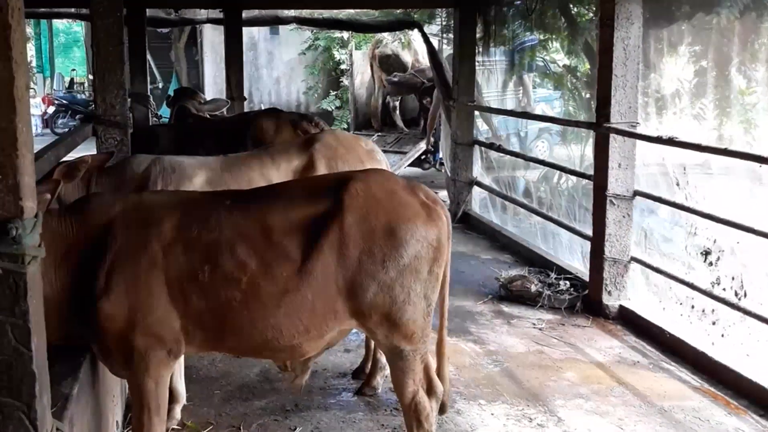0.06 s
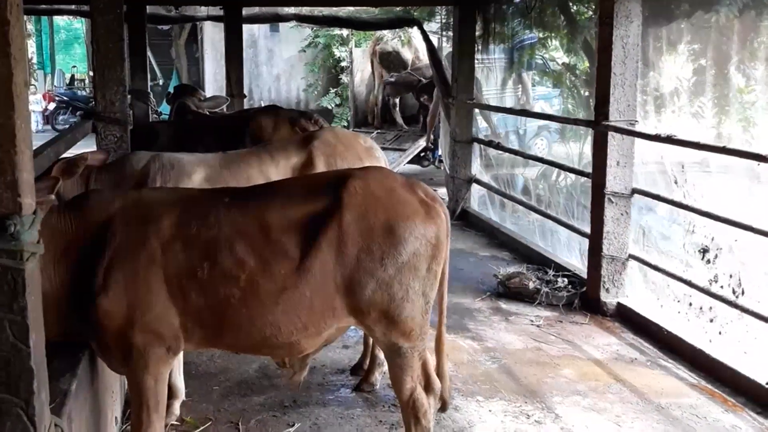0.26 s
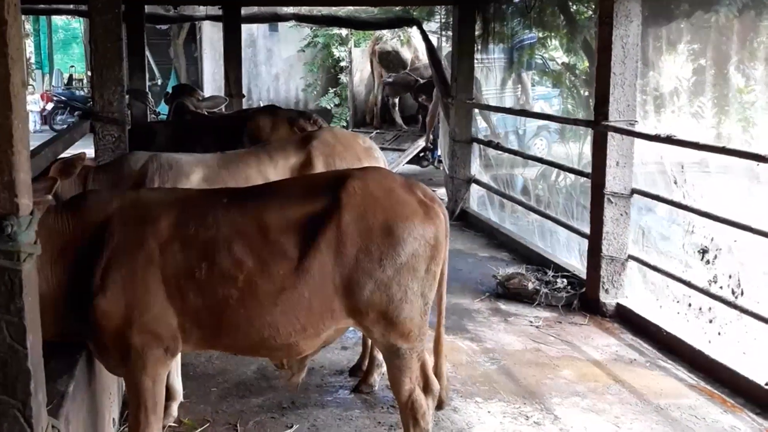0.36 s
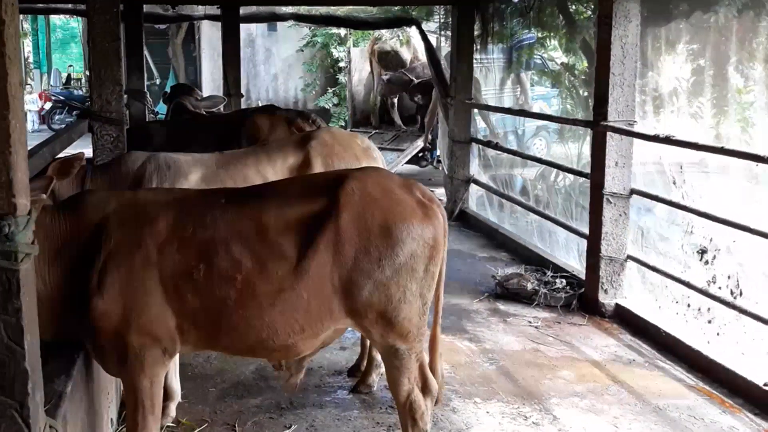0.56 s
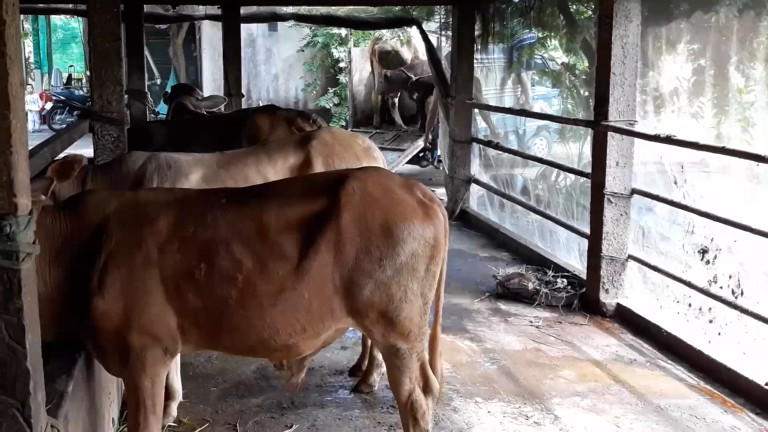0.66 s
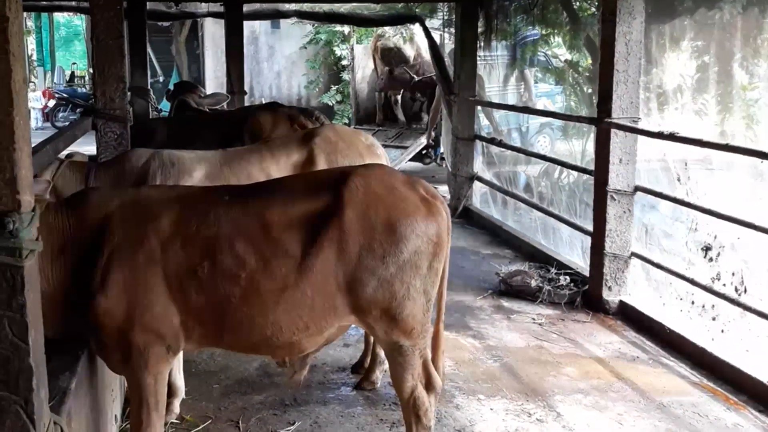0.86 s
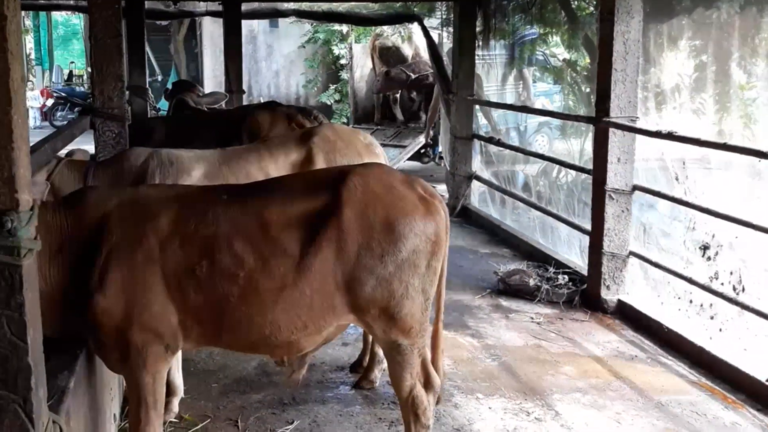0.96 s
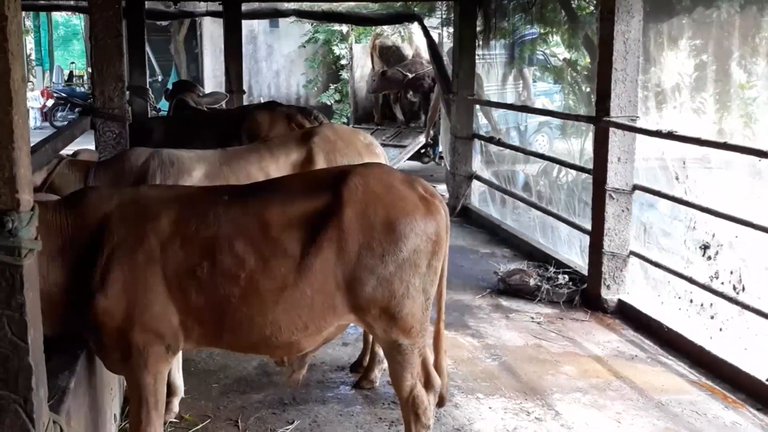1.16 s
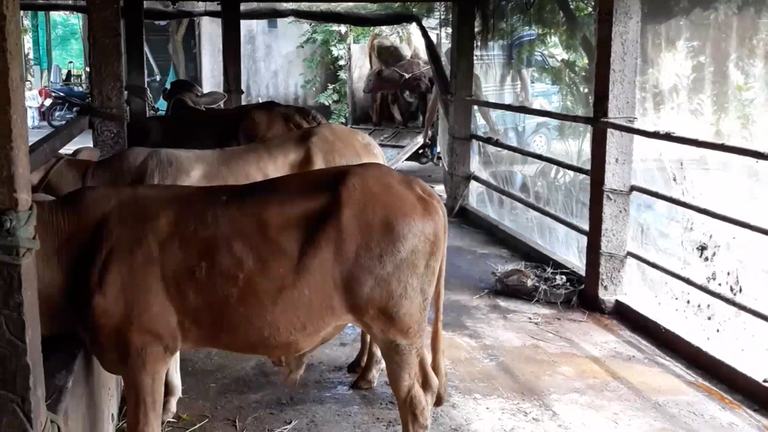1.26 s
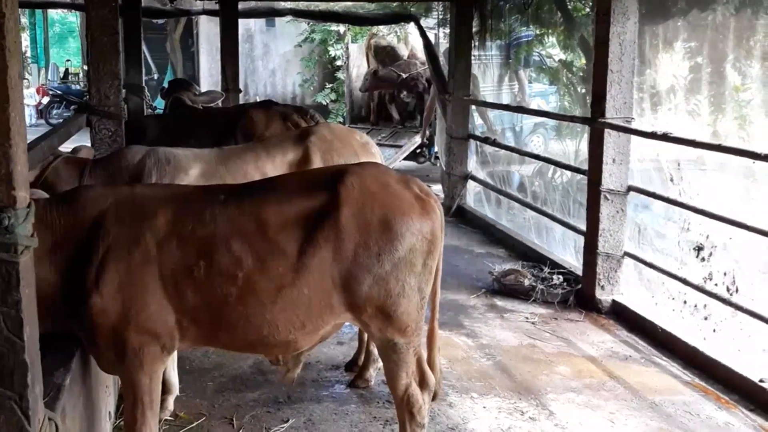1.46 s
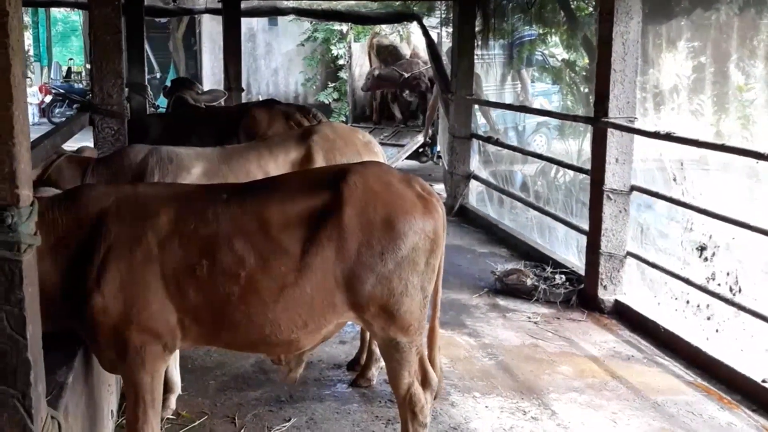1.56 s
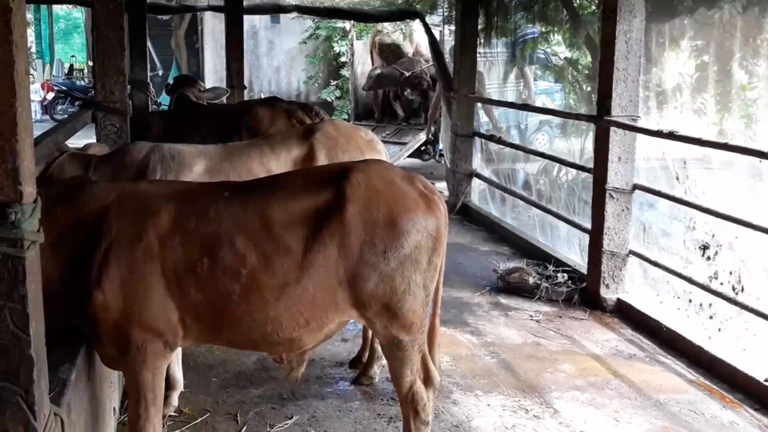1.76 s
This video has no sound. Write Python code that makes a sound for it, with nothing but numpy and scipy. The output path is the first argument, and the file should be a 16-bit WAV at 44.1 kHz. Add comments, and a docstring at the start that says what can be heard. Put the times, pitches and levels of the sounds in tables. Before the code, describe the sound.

One cow moo starts as a low, closed-mouth creak with a faint puff, swells into a booming, hoarse bellow, then sinks and fades. A small microphone nearby catches the roofed stall's echo and dull, steady outdoor noise.

```python
"""One cow moos in an open-sided stall under a sheet roof: a low creak with the mouth shut, then a loud
open bellow whose pitch rises, holds with strong and weak pulses in turn, and sags. The pulses ring throat
and chest and rasp through the mouth, over a booming second partial. The stall echoes and hums along;
a soft hiss leads in, over steady yard noise. A small microphone cuts the bass and turns its gain down."""
import sys
import numpy as np
from scipy import signal
from scipy.fft import rfft, irfft, next_fast_len
from scipy.io import wavfile
from scipy.ndimage import uniform_filter1d, minimum_filter1d

SR = 44100
rng = np.random.default_rng(int(sys.argv[2]) if len(sys.argv) > 2 else 0)


def store_wav(level_fs):
    """Save 16-bit WAV to argv[1]."""
    pcm = np.round(np.clip(np.atleast_2d(level_fs), -1, 1) * 32767)
    wavfile.write(sys.argv[1], SR, pcm.T.astype(np.int16))


N = 79380

# colour of the yard bed and of the opening hiss: f/Hz, relative density/dB
YARD_SPECTRUM = [(18, -73), (30, 3), (284, 9.5), (591, 7), (747, -7.5), (1080, -1), (1400, -3.5),
                 (1680, -2.5), (4660, -9.5), (15500, -23.5)]
PUFF_SPECTRUM = [(1760, -41), (3000, 6), (3420, -7), (3760, -6), (4530, 4), (6300, -16), (8890, 1),
                 (10100, -13), (15500, -15)]
# early echoes off floor, trough, rails and the other animals: delay/s, gain/dB
EARLY_ECHOES = [(.0031, -2.5), (.0057, -1.5), (.0074, -3.5), (0.0099, -3.5), (0.0126, -3), (.0172, -7)]
# round trips between roof, floor, trough wall and flanks: delay/s
STALL_TRIPS = [.0211, .0263, .0307, .0349, .0401, .0443, .0517, .0589]
# air modes of the stall: f/Hz, relative level/dB, t60/s
AIR_MODES = [(159.9, 5.5, 1), (224.66, 7.5, 0.85), (312.6, 6, 0.57), (499.4, 3, 0.13), (863.3, 8.5, 0.21),
             (886.5, 5, 0.22), (1128, -0.5, 0.11)]
# resonances of the open mouth, low to high: f/Hz, width/Hz, relative level/dB
MOUTH_FORMANTS = [(1185, 108, -2.5), (1517, 80, 2), (1783, 165, -1), (2144, 150, -3.5)]
PALATE_FORMANTS = [(2692, 690, 8), (3240, 270, -7.5), (4050, 200, 0.5), (4830, 530, -2)]
TEETH_FORMANTS = [(5950, 740, 3), (6750, 300, 3), (8170, 610, 3), (9300, 230, -7.5), (11100, 1300, -21.5),
                  (13000, 260, -9), (14500, 1700, -28)]
# rasp through the open mouth: t/s, relative level/dB, palate lift/dB, teeth lift/dB
RASP_CURVE = [(0.12, -48, -1, 4), (0.166, -45, 1, -27), (0.23, -16, -8, -34), (0.274, -14, -12.5, -29.5),
              (0.826, -17, -9, -22), (0.886, -18, -20, -24.5), (0.922, -24, -13, -19.5),
              (0.982, -19, -11, -23), (1.054, -25.5, -12, -20), (1.072, -20, -13.5, -25.5),
              (1.162, -21.5, -12, -23), (1.418, -26.5, -8, -21.5), (1.556, -33, -5, -17.5),
              (1.66, -56, 3.5, -10)]
# swells and dips of the second partial: t/s, pitch/Hz (unused), relative level/dB
BOOM_CURVE = [(0.12, 61.1, -58), (0.198, 83.0, -25), (0.226, 88.9, -12), (0.256, 94.4, -28),
              (0.284, 98.0, -5), (0.296, 98.9, -13.5), (0.416, 108.9, -12.5), (0.514, 110.1, -10),
              (0.54, 110.9, -34), (0.622, 111.3, -7.5), (0.664, 110.7, -20.5), (0.878, 112.7, -6),
              (0.976, 109.8, -15), (1.002, 108.2, -16.5), (1.042, 104.2, -5), (1.232, 94.8, -21.5),
              (1.24, 93.8, -27.5), (1.34, 84.0, -19), (1.438, 75.1, -32.5), (1.468, 73.4, -42),
              (1.52, 71.7, -33), (1.6, 66.7, -38)]
# chest resonance, opening with the moo and strongest as the voice sinks: t/s, lift/dB
CHEST_CURVE = [(.05, -25), (.17, -16), (.3, 1.5), (1.0, -6), (1.3, -4), (1.45, 3), (1.66, 18.5)]
# the moo's gesture: t/s, pitch/Hz, effort/dB, throat resonance/Hz, upper resonance/Hz, its lift/dB,
# strong-weak alternation/0-1 (capped in moo), roughness/0-1
MOO_CURVE = [(0.05, 50.7, -44, 410, 850, -13, 0.3, 0), (0.098, 56.74, -38, 407, 850, -46, 0.1, 0.2),
             (0.152, 72.16, -30, 393, 895, -52, 0.2, 0.02), (0.196, 83.44, -24.5, 536, 870, -2.5, 0.7, 0.3),
             (0.242, 93.1, -14, 580, 930, -10.5, 0.5, 0.31), (0.286, 98.52, -5.5, 494, 840, -6, 0.3, 0.3),
             (0.39, 106.9, -13.5, 516, 864, -3.5, 0.34, 0.31),
             (0.43, 108.6, -12, 545, 855, -6.5, 0.07, 0.31), (0.552, 110.3, -9.5, 503, 864, -1.5, 1, 0.31),
             (0.596, 112, -11, 478, 823, -3, 0.1, 0.28), (0.65, 110.9, -11, 507, 845, -9.5, 0.09, 0.31),
             (0.816, 111.9, -13, 480, 824, -3.5, 0.8, 0.31), (0.884, 112.8, -19, 435, 753, 6, 0.3, 0.31),
             (0.982, 109.3, -10, 463.6, 810, -13, 0.5, 0.31),
             (1.068, 103.1, -15, 558, 834.7, -10.5, 0, 0.17),
             (1.206, 95.9, -14.5, 405, 807, -10.5, 0.1, 0.18),
             (1.268, 90.9, -15.5, 500.8, 803.6, -1, 0.2, 0.18),
             (1.376, 81.2, -14, 458, 808, -5.5, 0.29, 0.29), (1.48, 72.13, -20, 494, 827, 3.5, 0.7, 0.31),
             (1.538, 70.9, -21, 450, 810, -8, 1, 0.31), (1.61, 65.75, -31, 370.5, 862, -32, 1, 0.31),
             (1.66, 62.33, -28.5, 480, 832, 7.5, 0, 0)]


def from_db(db):
    """dB to gain."""
    return 10 ** (np.asarray(db) / 20)


def rms_one(x):
    """Scale to rms 1."""
    return x / np.sqrt(np.mean(x ** 2) + 1e-20)


def columns(rows):
    """Curve rows read at every sample."""
    times, *values = np.transpose(rows)
    return [np.interp(np.arange(N) / SR, times, column) for column in values]


def fade(rows, fade_s):
    """Fade in and out within the span of a curve."""
    t = np.arange(N) / SR
    return np.clip((t - rows[0][0]) / fade_s, 0, 1) * np.clip((rows[-1][0] - t) / fade_s, 0, 1)


def swell(at_s, rise_s, fall_s):
    """Bell-shaped envelope with its own rise and fall."""
    t = np.arange(N) / SR - at_s
    return np.exp(-.5 * (t / np.where(t < 0, rise_s, fall_s)) ** 2)


def wobble(rate_hz):
    """Smooth random drift; rms 1."""
    r = np.exp(-2 * np.pi * rate_hz / SR)
    return rms_one(signal.lfilter([1], [1, -2 * r, r * r], rng.standard_normal(N + 4000))[4000:])


def coloured(spectrum):
    """Noise with the given spectrum; rms 1."""
    hz, db = np.transpose(spectrum)
    grid = np.maximum(np.fft.rfftfreq(N, 1 / SR), 1)
    gain = from_db(np.interp(np.log(grid), np.log(hz), db, left=-90, right=-90))
    return rms_one(irfft(rfft(rng.standard_normal(N)) * gain, N))


def resonate(x, hz, width_hz):
    """Two-pole resonance, gain 1 at its peak."""
    r = np.exp(-np.pi * width_hz / SR)
    poles = [1, -2 * r * np.cos(2 * np.pi * hz / SR), r * r]
    return signal.lfilter(np.array([1, 0, -1]) * (1 - r * r) / 2, poles, x)


def hump(hz, centre_hz, width_hz):
    """Weight of a partial under a resonance peak."""
    return 1 / (1 + (2 * (hz - centre_hz) / width_hz) ** 2)


def band(x, formants, high_hz):
    """One region of the mouth: parallel resonances of alternating sign, low-passed; rms 1."""
    rung = sum((-1) ** k * from_db(db) * resonate(x, hz, width)
               for k, (hz, width, db) in enumerate(formants))
    return rms_one(signal.sosfilt(signal.butter(4, high_hz, fs=SR, output="sos"), rung))


def yard():
    """A steady bed of dull outdoor noise."""
    return from_db(-41.5) * coloured(YARD_SPECTRUM)


def stall_echoes(x, bass_t60_s=.55, wall_cut_hz=1330):
    """Sound bounces around under the roof, duller on every round trip."""
    size = next_fast_len(N + SR)
    hz = np.fft.rfftfreq(size, 1 / SR)
    echoes = 0
    for k, lag in enumerate(STALL_TRIPS):
        loss = from_db(-60 * lag / bass_t60_s) / (1 + 1j * hz / wall_cut_hz)
        loop = loss * np.exp(-2j * np.pi * hz * lag)
        echoes = echoes + (-1) ** k * loop / (1 - loop)
    return from_db(2.5) * irfft(rfft(x, size) * echoes, size)[:N] / np.sqrt(len(STALL_TRIPS))


def stall_hum(x):
    """The air in the stall rings on at its low modes."""
    return sum(2 * from_db(db) * resonate(x, hz, np.log(1000) / (np.pi * t60))
               for hz, db, t60 in AIR_MODES)


def near(x):
    """Direct sound with its echoes off nearby surfaces, signs alternating."""
    out = x.copy()
    for k, (delay_s, db) in enumerate(EARLY_ECHOES):
        lag = int(delay_s * SR)
        out[lag:] += (-1) ** k * from_db(db) * x[:-lag]
    return out / np.sqrt(1 + sum(from_db(db) ** 2 for _, db in EARLY_ECHOES))


def puff():
    """A short soft hiss, probably air through the nostrils."""
    return from_db(-43.5) * swell(at_s=.083, rise_s=.012, fall_s=.077) * coloured(PUFF_SPECTRUM)


def mouth_rasp(pulses, air):
    """Pulses and breath ring mouth, palate and teeth, with a bright bite as the bellow opens."""
    level_db, palate_db, teeth_db = columns(RASP_CURVE)
    buzz = pulses + air
    thin_buzz = signal.sosfilt(signal.butter(4, 1100, "high", fs=SR, output="sos"), buzz)
    mouth = band(thin_buzz, MOUTH_FORMANTS, high_hz=2350)
    palate = from_db(palate_db - 1.5) * band(buzz, PALATE_FORMANTS, high_hz=5540)
    teeth = from_db(teeth_db) * band(.5 * pulses + air, TEETH_FORMANTS, high_hz=16100)
    bite = swell(at_s=.24, rise_s=.045, fall_s=.1) * band(buzz, [(3700, 700, 0)], high_hz=5000)
    return from_db(level_db) * fade(RASP_CURVE, .023) * (mouth + palate + teeth) + from_db(-36) * bite


def hoarseness(breath, hz=424, width_hz=490):
    """Breath darkened by the throat."""
    return rms_one(resonate(resonate(breath, hz, width_hz), hz, width_hz))


def second_partial(cycles):
    """The boom: a sine an octave above the pitch that swells and dips."""
    level_db = columns(BOOM_CURVE)[-1]
    return np.sqrt(2) * from_db(level_db) * fade(BOOM_CURVE, .03) * np.cos(4 * np.pi * cycles)


def throat_tone(cycles, pitch, alternation, throat_hz, upper_hz, upper_db):
    """Partials shaped by throat, chest and nose; strong-weak pulsing adds half orders between them."""
    chest_gain = from_db(columns(CHEST_CURVE)[0])
    nose_gain = from_db(np.minimum(upper_db + 11, 0) - 7.5)   # muffled while the mouth is shut
    tone, body_power = 0, 1e-12
    for order in np.arange(1.5, 20, .5):
        if order == 2:   # the boom fills this slot
            continue
        hz = order * pitch
        share = alternation if order % 1 else 1
        body = hump(hz, throat_hz, width_hz=199) + chest_gain * hump(hz, 233.4, width_hz=60)
        upper = from_db(upper_db + 2.5) * hump(hz, upper_hz, width_hz=80)
        nose = nose_gain * hump(hz, 1140, width_hz=67)
        smear = .2491 * order ** 2   # radians: draws each pulse out so it does not click
        tone = tone + share * (body + upper + nose) * np.cos(2 * np.pi * order * cycles - smear)
        body_power = body_power + (share * body) ** 2 / 2
    return tone / np.sqrt(body_power)


def moo(jitter_cycles=.015, shimmer_db=3):
    """One unsteady pulse train in the throat drives three layers: tone, boom and rasp."""
    pitch, effort_db, throat_hz, upper_hz, upper_db, alternation, rough = columns(MOO_CURVE)
    alternation = np.minimum(alternation, .35)
    cycles = np.cumsum(pitch) / SR + jitter_cycles * rough * wobble(rate_hz=40)
    shimmer = from_db(shimmer_db * rough * wobble(rate_hz=75))
    breath = np.exp(.7 * np.cos(2 * np.pi * cycles - 1)) * rng.standard_normal(N)   # a gust per cycle
    partials = shimmer * throat_tone(cycles, pitch, alternation, throat_hz, upper_hz, upper_db)
    fundamental = from_db(-27) * np.cos(2 * np.pi * cycles)
    envelope = from_db(effort_db + 6) * fade(MOO_CURVE, .03)
    tone = envelope * (partials + fundamental + rough * hoarseness(breath))
    count = np.floor(cycles)
    strong_weak = 1 + alternation * (-1) ** count
    pulses = np.diff(count, prepend=0) * strong_weak * shimmer * np.sqrt(SR / pitch)
    rasp = from_db(7) * mouth_rasp(pulses, air=from_db(4) * breath)
    return tone, second_partial(cycles), rasp


def scene():
    """The mono mix: the cow up front, sends to the stall's echoes and hum, hiss and yard behind."""
    tone, boom, rasp = moo()
    near_rasp = near(rasp)
    voice = .54 * tone + .66 * near(tone) + near_rasp
    echoes = stall_echoes(from_db(-5) * tone + near_rasp)
    hum = stall_hum(voice + from_db(-5.5) * boom)
    return (voice + from_db(9.5) * boom + echoes + hum + puff() + yard())[None]


def record(dry, threshold_db=-27, ratio=1.364, attack_s=.0013, release_db_per_s=1.5, ceiling=1.05):
    """Small microphone: gain that ducks fast and creeps back, a limiter, bass and treble cut."""
    over_db = np.maximum(20 * np.log10(np.abs(dry[0]) + 1e-9) - threshold_db, 0)
    release_db = release_db_per_s * np.arange(N) / SR
    held_db = np.maximum.accumulate(over_db + release_db) - release_db
    r = np.exp(-1 / (attack_s * SR))
    cut_db = signal.lfilter([1 - r], [1, -r], held_db) * (1 - 1 / ratio)
    x = dry * from_db(-cut_db)
    window = int(.012 * SR)   # the limiter looks ahead
    safe_gain = ceiling / np.maximum(np.abs(x), ceiling)
    x = x * uniform_filter1d(minimum_filter1d(safe_gain, window), window)
    x = x / (1 + np.abs(x / ceiling) ** 10) ** (1 / 10)   # rounds the peaks
    bass_cut = signal.butter(3, 65, "high", fs=SR, output="sos")
    treble_cut = signal.ellip(12, .1, 70, 15680, fs=SR, output="sos")
    return signal.sosfilt(treble_cut, np.clip(signal.sosfilt(bass_cut, x), -.99, .99))


dry = scene()
out = record(dry)
store_wav(out)
```